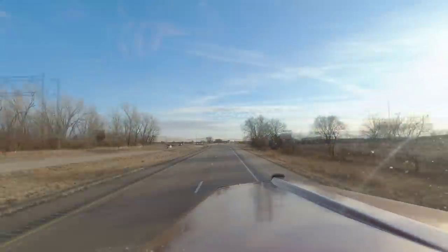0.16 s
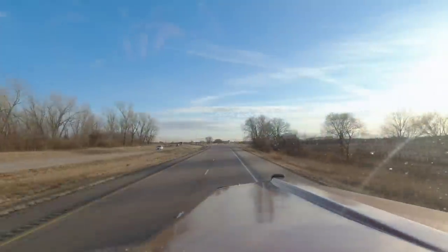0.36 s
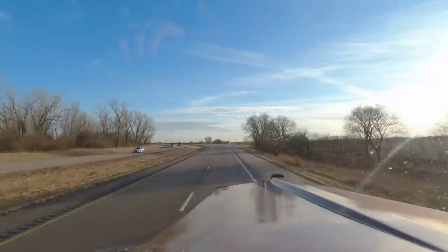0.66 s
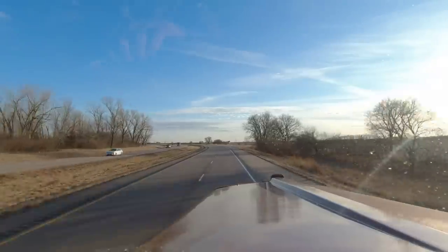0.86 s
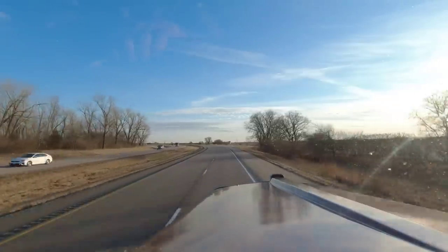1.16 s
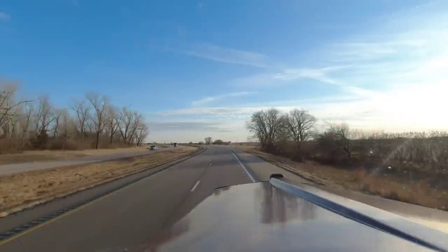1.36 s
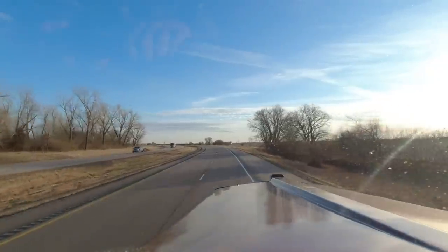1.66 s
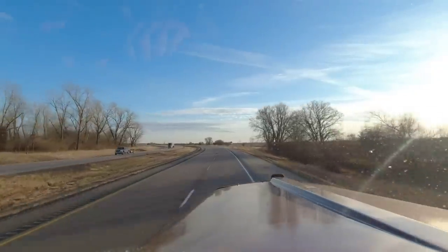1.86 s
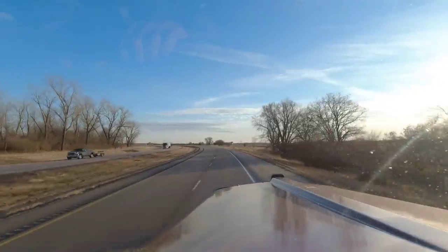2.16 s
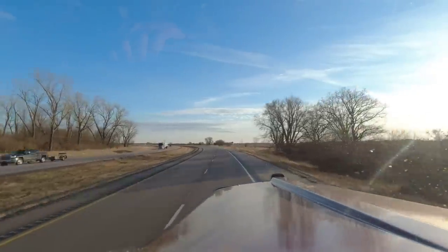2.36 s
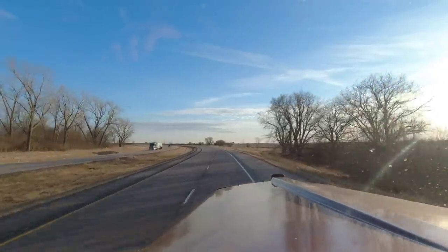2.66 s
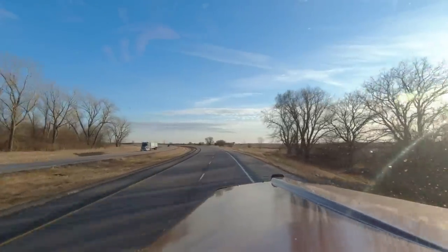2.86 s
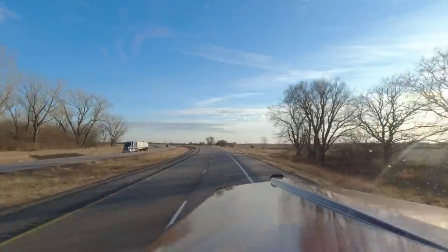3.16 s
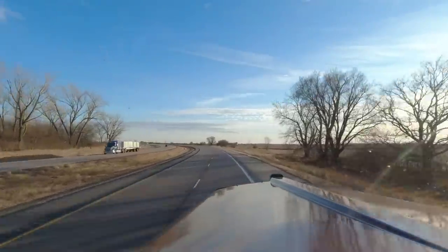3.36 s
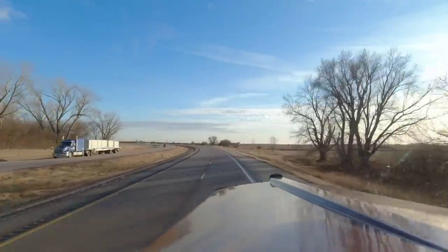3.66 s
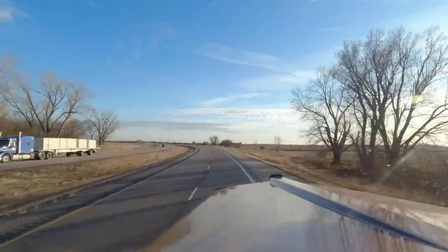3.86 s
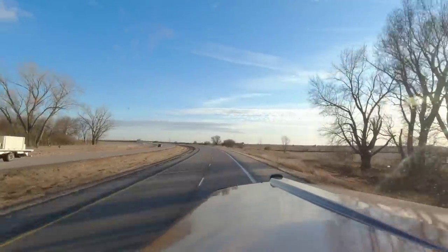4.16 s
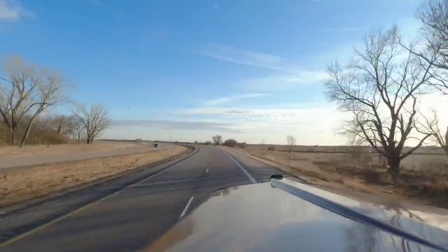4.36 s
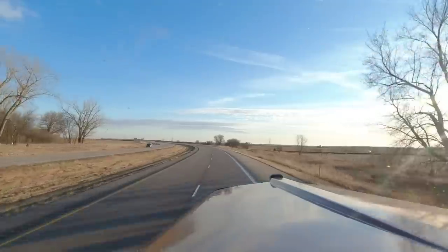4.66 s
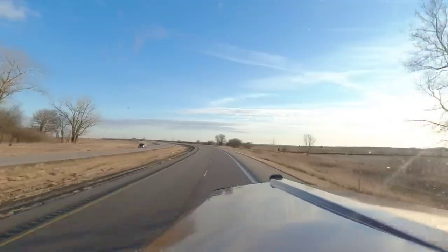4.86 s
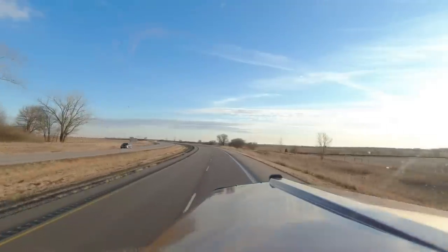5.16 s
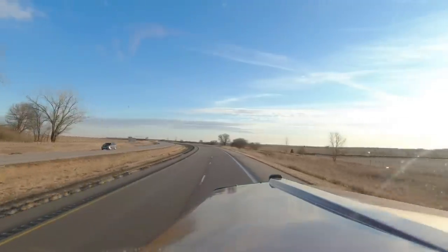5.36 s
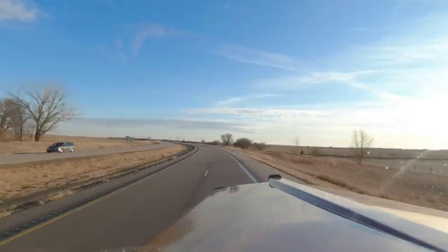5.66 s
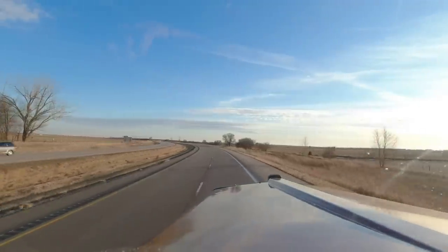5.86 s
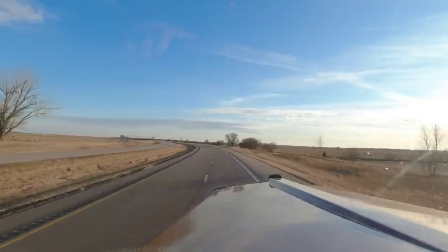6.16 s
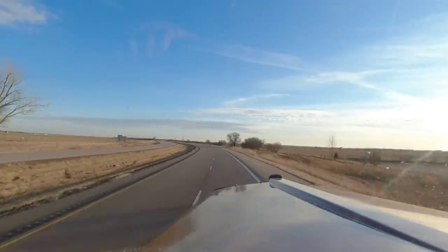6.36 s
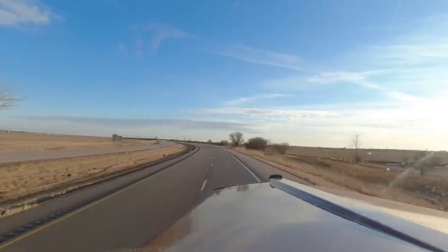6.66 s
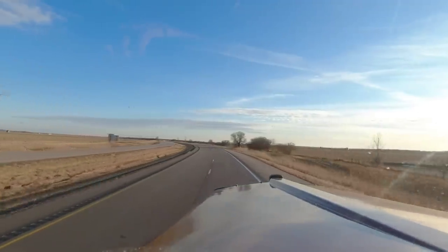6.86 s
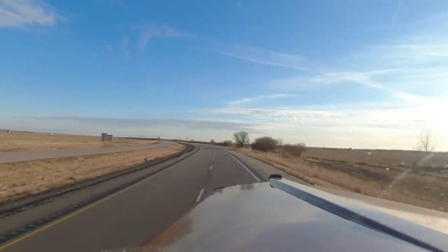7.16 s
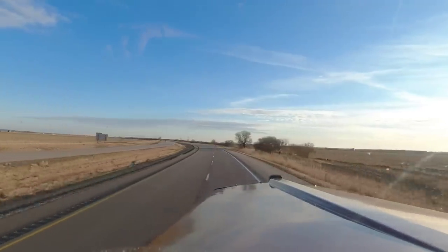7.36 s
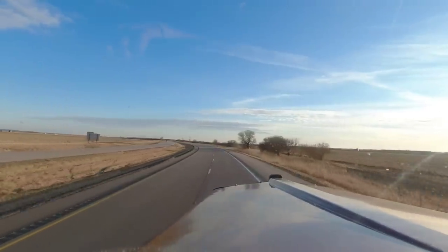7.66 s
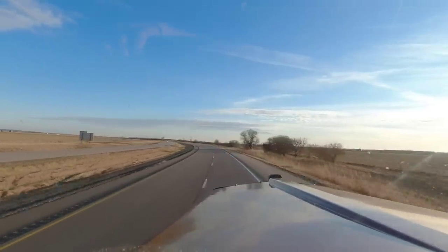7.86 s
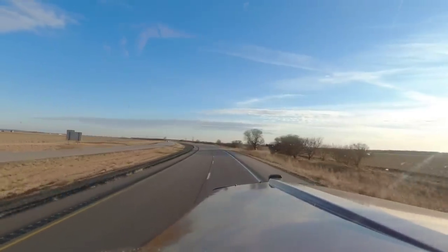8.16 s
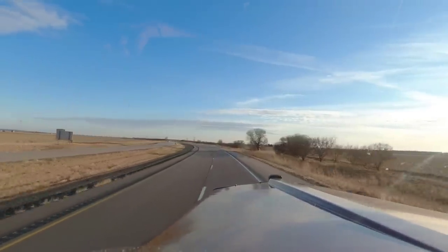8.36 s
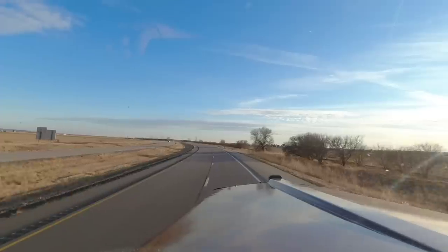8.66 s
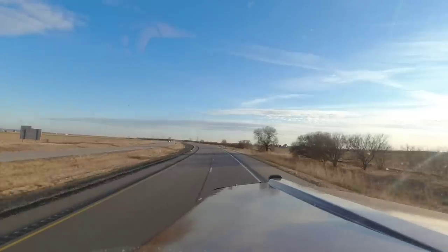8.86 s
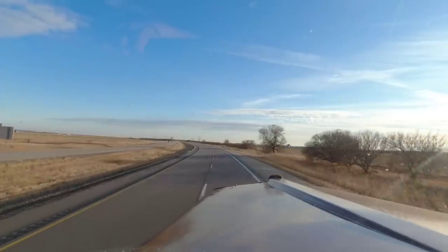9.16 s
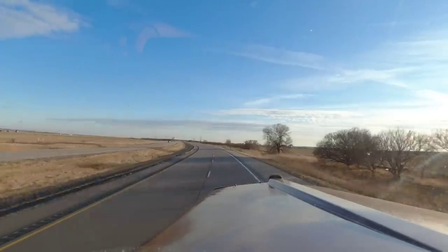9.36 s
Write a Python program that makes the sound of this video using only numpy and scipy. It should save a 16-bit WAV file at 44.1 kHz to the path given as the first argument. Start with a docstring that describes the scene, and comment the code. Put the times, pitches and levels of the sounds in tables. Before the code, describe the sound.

Inside a truck cab, a brief pulsing drone fades, then steady low diesel boom, tyre rumble and wind build, with faint high turbo whistles flaring.

```python
"""A throbbing hollow drone and a falling turbo whistle die away, then a heavy truck cab at cruise swells in.
Crank orders summed as sines make the six-cylinder diesel's drone; cyclic noise makes its growl and clatter.
Shaken narrow-band noise makes a raspy ring, a sine the faint gear whine; the turbo whistle is a blurred
tone plus bands of air noise, flaring at set times. Coloured noise makes the road rumble and wind hiss."""
import sys
import numpy as np
from scipy import signal
from scipy.fft import rfft, irfft, next_fast_len
from scipy.io import wavfile
from scipy.ndimage import uniform_filter1d, map_coordinates

SR = 44100
rng = np.random.default_rng(int(sys.argv[2]) if len(sys.argv) > 2 else 0)


def store_pcm(level_fs):
    """Save levels as 16-bit WAV."""
    pcm = np.round(np.clip(level_fs, -1, 1) * 32767).astype(np.int16)
    wavfile.write(sys.argv[1], SR, np.atleast_2d(pcm).T)


N = 419391


def amp(db):
    """Decibels to gain."""
    return 10 ** (np.asarray(db) / 20)


def unit(x):
    """Scale to rms 1."""
    return x / np.sqrt(np.mean(x ** 2) + 1e-20)


def along(points, hz):
    """Interpolate (hz, value) points on a log frequency axis."""
    f, v = np.transpose(points)
    return np.interp(np.log(hz + 1), np.log(f + 1), v)


def shape(spectrum):
    """Gain over frequency of (hz, db) points."""
    return lambda hz: amp(along(spectrum, hz))


def curves(rows):
    """One value per sample for each column after the time."""
    s, *cols = np.transpose(rows)
    return [np.interp(np.arange(N) / SR, s, c) for c in cols]


def wobble(rate_hz, step=1):
    """Smooth random curve: rate_hz knots a second, one value every step samples."""
    knots = rng.standard_normal(int(N * rate_hz / SR) + 4)
    coarse = np.arange(0, N, 128)
    smooth = map_coordinates(knots, [coarse * rate_hz / SR])
    return np.interp(np.arange(0, N, step), coarse, smooth)


def swell(cruise_db, start_db, rise_s):
    """Level in dB of an amplitude that starts at start_db against cruise_db and closes in on cruise_db."""
    swell_start_s = 0.29
    t = np.maximum(np.arange(N) / SR - swell_start_s, 0)
    return cruise_db + 20 * np.log10(1 + (amp(start_db) - 1) * np.exp(-t / rise_s))


def release(hold_s, db_per_s):
    """Level in dB that holds, then falls at a steady rate."""
    return -db_per_s * np.maximum(np.arange(N) / SR - hold_s, 0)


def filtered(x, response):
    """x times a response over frequency."""
    m = next_fast_len(N + 8192, True)
    gain = response(np.fft.rfftfreq(m, 1 / SR)).astype(np.complex64)
    return irfft(rfft(x.astype(np.float32), m) * gain, m)[..., :N]


def patchy_noise(patchy_db):
    """Two white noises sharing time-frequency patches of random gain."""
    z = signal.stft(rng.standard_normal((2, N)), nperseg=512)[2]
    field = rng.standard_normal(z.shape[1:])
    field = uniform_filter1d(uniform_filter1d(field, 6, 0), 16, 1)
    return unit(signal.istft(z * amp(patchy_db * unit(field)), nperseg=512)[1][:, :N])


def skirt(hz, width_hz):
    """Narrow band of air noise around a pitch: low-passed noise times a carrier."""
    phase = 2 * np.pi * np.cumsum(hz) / SR
    base = signal.lfilter(*signal.butter(1, width_hz, fs=SR), rng.standard_normal((2, N)))
    base = signal.lfilter(*signal.butter(1, 2 * width_hz, fs=SR), base)
    return unit(base * np.cos(phase))


def cab_colour(hz):
    """Gain over frequency of the window reflections: peaks and notches."""
    # centre_hz, width_hz, gain_db
    echoes = [(1047, 40, 2.9), (1300, 60, -1), (1370, 73, 1.5), (1710, 55, -0.5), (2166, 60, 3.5),
              (2260, 70, -5), (2440, 70, 3.5), (2560, 90, -4.5), (2900, 70, -1), (2950, 63, 3),
              (2996, 90, -7), (3260, 310, 1), (3750, 110, -1.5), (5240, 250, -1.3)]
    grid = np.arange(0, SR / 2, 10)
    db = sum(gain_db * np.exp(-(2 * (grid - centre) / width) ** 2) for centre, width, gain_db in echoes)
    return np.interp(hz, grid, amp(db))


def in_cab(pair, colour):
    """Colour a direct and a diffuse signal and spread them over two close microphone ports; mid rms 1."""
    # stereo spread: pitch_hz, side_against_mid_db
    spread = [(60, -23), (92, -18), (140, -32.5), (210, -16), (330, -11.5), (500, -11.5), (760, -14),
              (1170, -7.5), (1780, -2.5), (2720, 2), (4160, 3), (6350, -9), (9710, 0), (14800, -5)]
    # share of the side that reaches the left port early: pitch_hz, share
    early_share = [(300, .1), (1000, 0.46), (2000, .55), (3500, .3), (5000, 0), (8000, 0), (9000, .3),
                   (10500, 0)]
    m = next_fast_len(N + 8192, True)
    hz = np.fft.rfftfreq(m, 1 / SR)
    direct, diffuse = rfft(pair.astype(np.float32), m) * colour(hz) * cab_colour(hz)
    lead = np.clip(along(early_share, hz), -1, 1)
    side = amp(along(spread, hz)) * (1j * lead * direct + np.sqrt(1 - lead ** 2) * diffuse)
    mid, side = irfft(np.array([direct, side], np.complex64), m)[:, :N]
    return np.array([mid + side, mid - side]) / np.std(mid)


def drone(turns, waver_db, sway_rad, lag_s):
    """Crank orders boom in the cab: the firing orders, and others from unequal cylinders."""
    # crank orders, 3 being the firing rate: multiple_of_crank_speed, level_db
    orders = [(1.0, -27), (1.5, -39), (2.0, -22), (2.5, -39), (3.0, -18.5), (3.5, -46), (4.0, -30.5),
              (4.5, -28), (5.0, -26), (6.0, -17), (6.5, -50), (7.0, -24), (7.5, -31.5), (8.0, -27.5),
              (8.5, -34.5), (9.0, -18.7), (9.5, -39), (10.0, -30), (10.5, -39), (11.0, -35), (11.5, -45),
              (12.0, -38.5), (12.5, -44), (13.0, -35.3), (13.5, -39.5), (14.0, -32.5), (14.5, -44),
              (15.5, -47.5), (16.0, -44.5), (16.5, -38), (17.0, -42), (17.5, -41), (19.5, -52), (21.0, -45),
              (22, -50.5), (23.0, -46.5), (24, -56), (26, -57), (27, -48.5), (28, -52), (28.5, -47.5),
              (29, -58)]
    # the cab delays high orders more, smearing each pulse into an even beat; cycles per order squared
    firing_smear, imbalance_smear = .088, .554
    step = 16
    coarse_turns, out = turns[::step], 0
    for multiple, db in orders:
        order = round(2 * multiple) / 2
        smear = firing_smear if order % 3 == 0 else imbalance_smear
        phase = 2 * np.pi * (order * coarse_turns + smear * order ** 2) + sway_rad * wobble(2.42, step)
        out = out + amp(db + waver_db * wobble(2.49, step)) * np.cos(phase)
    boom = unit(signal.resample_poly(out, step, 1, window=("kaiser", 9))[:N])
    n = np.arange(N)
    return np.array([boom, np.interp(n - lag_s * SR, n, boom)])  # the right port hears it later


def cycle(turns):
    """Two signals repeating every two crank turns, with all engine orders equally strong."""
    size = 4096
    orders = np.exp(2j * np.pi * rng.random((2, size // 2 + 1)))
    return unit(irfft(orders))[:, (turns / 2 % 1 * size).astype(int)]


def combustion(turns, repeat, pulsing, lope, drift_rad):
    """Burn and valve noise: a slowly changing cyclic pattern, surging with each firing and each turn."""
    blend = drift_rad * wobble(1.498)
    repeated = np.cos(blend) * cycle(turns) + np.sin(blend) * cycle(turns)
    share = np.clip(repeat, 0, 1)
    burn = np.sqrt(share) * repeated + np.sqrt(1 - share) * rng.standard_normal((2, N))
    firing = np.cos(2 * np.pi * 3 * turns)
    return burn * (1 + pulsing * firing + lope * np.cos(2 * np.pi * turns))


def panels(hz):
    """Gain over frequency of the cab panels that resonate with the engine."""
    # centre_hz, width_hz, level_db
    resonances = [(500, 36, -4), (654.3, 39, -4.5), (774, 53, -7.5), (946, 40, -11.5)]
    return sum(amp(db) / (1 + ((hz - centre) / (width / 2)) ** 2) ** 0.79
               for centre, width, db in resonances)


def growl(turns):
    """Combustion noise rings the cab panels."""
    # slow drift: time_s, drift_db
    drift = [(.75, -3), (1.05, 0), (1.3, -3), (1.9, 2.5), (2.3, -2), (3.65, 1), (5.1, -1), (6.1, -0.5),
             (6.45, -1), (6.68, 3), (7.1, -3.5), (7.8, 1), (8.8, -3)]
    level_db = swell(cruise_db=-33, start_db=-7.5, rise_s=0.17) + curves(drift)[0]
    burn = combustion(turns, repeat=0.6, pulsing=0.049, lope=0.12, drift_rad=0.92)
    return amp(level_db + 0.67 * wobble(5.4)) * in_cab(burn, panels)


def clatter(turns, swell_db, drift_db):
    """Combustion noise in a brighter band, in random clumps."""
    # pitch_hz, level_db_per_hz
    spectrum = [(300, -25), (450, 2), (600, -4.5), (1050, 0.5), (1280, -1), (1530, -0.5), (1720, -10),
                (1930, -7.5), (2010, -5.5), (2200, -7.5), (2600, -15.5), (5000, -29.5), (9000, -80)]
    clumps_db = 0.8 * wobble(8) + 1.0 * wobble(32)
    burn = combustion(turns, repeat=0.32, pulsing=0.03, lope=0.036, drift_rad=1.23)
    return amp(swell_db + 0.85 * drift_db + clumps_db) * in_cab(burn, shape(spectrum))


def rasp(turns, swell_db, drift_db):
    """An unsteady engine-block resonance, shaken by each firing, stands out as the clatter swells."""
    centre_hz, width_hz, wander_hz = 1499, 82, 25
    against_clatter_db, follows = -11, 1.8  # drifts more steeply than the clatter
    ring = skirt(centre_hz + wander_hz * wobble(3), width_hz)
    firing = 1 + .35 * np.cos(2 * np.pi * 3 * turns)
    level_db = swell_db + against_clatter_db + follows * drift_db + 1.4 * wobble(18)
    return amp(level_db) * in_cab(ring * firing, np.ones_like)


def gear_whine(turns, clatter_swell_db):
    """A thin tone tied to the crank speed."""
    mean_hz, against_clatter_db = 2000, -24
    mesh = turns / turns[-1] * mean_hz * N / SR
    tone = unit(np.sin(2 * np.pi * mesh + wobble(12)))
    return amp(against_clatter_db + clatter_swell_db + 2.2 * wobble(5.4)) * tone


def panel_hum():
    """The lowest cab panel hums by itself: a narrow, fuzzy note that comes and goes."""
    # time_s, level_db
    hum_level = [(0, -47), (.35, -40), (1, -40), (1.9, -33.5), (2.5, -46), (3.5, -36), (4.4, -48),
                 (6.6, -38.5), (7.3, -48), (9, -53)]
    level_db, = curves(hum_level)
    return amp(level_db) * skirt(np.full(N, 495.4), width_hz=9.6)[0]


def whistle(hz, width_hz, flutter_db):
    """A blade tone blurred by turbulence, differently at each port; rms 1."""
    phase = 2 * np.pi * np.cumsum(hz + width_hz * wobble(70)) / SR
    shared = amp(flutter_db * wobble(22)) * np.sin(phase)
    scatter = wobble(45) * np.sin(phase) + wobble(45) * np.cos(phase)
    return unit(unit(shared) + 0.22 * np.array([scatter, -scatter]))


def flares():
    """Extra dB of the whistle and of its octave: one bell-shaped surge for each flare."""
    # high-boost flares: peak_s, length_s, whistle_gain_db, octave_gain_db
    surges = [(4.38, .2, 5, 0), (4.8, 0.2, 4, 0), (5.002, 0.16, 7, 3), (5.258, .2, 6.5, 2),
              (5.414, 0.073, 3, 0), (5.706, .2, 6.5, 8), (6.04, 0.11, 3, 3), (6.29, 0.099, 3, 1),
              (6.486, 0.15, 7, 10), (6.68, .2, 10, 2), (7.21, 0.24, 11, -3), (7.45, 0.19, 6.5, -2),
              (7.618, 0.11, 8, 3), (7.845, 0.14, 4.5, 0), (8.05, .13, 8, -2), (8.208, 0.17, 6.5, -4),
              (8.37, 0.085, 7.5, 0), (8.56, 0.11, 3, 0), (8.75, .12, 1, 0), (9.07, .2, 0.5, 5)]
    t = np.arange(N) / SR
    return sum(np.outer(gains_db, np.exp(-(2 * (t - s) / length_s) ** 2))
               for s, length_s, *gains_db in surges)


def turbo():
    """The whistle grows with turbo speed: breathy at low boost, a clear tone when it flares."""
    # whistle under load: time_s, pitch_hz
    pitch = [(1, 6225), (3, 6240), (4, 6290), (5, 6375), (6, 6450), (7.3, 6530), (8.2, 6530), (9.3, 6440)]
    hz, = curves(pitch)
    above_low_boost_hz = hz - 6260
    flare_db, octave_flare_db = flares()
    whistle_swell_db = swell(cruise_db=-55.5, start_db=-23, rise_s=0.63)
    level_db = whistle_swell_db + 0.0139 * above_low_boost_hz + flare_db  # slopes in dB per Hz
    octave_db = swell(cruise_db=-61.5, start_db=-24.5, rise_s=1.5) + 0.0142 * above_low_boost_hz
    clear_db, clear_span_db = -54.5, 5.5  # breath turns to tone around this level, over this span
    clear = 1 / (1 + np.exp(-(level_db - clear_db) / clear_span_db))
    tone = clear * whistle(hz, width_hz=10.04, flutter_db=2.5) * amp(1.5)
    air = np.sqrt(1 - clear) * skirt(hz, width_hz=37) * amp(3.0)
    octave_tone = clear * whistle(2 * hz, width_hz=26, flutter_db=1)
    octave_air = amp(1) * np.sqrt(clear) * skirt(2 * hz, width_hz=110)
    octave = amp(octave_flare_db) * (octave_tone + octave_air)
    octave = octave + skirt(2 * hz - 160, width_hz=330) * amp(2.0)
    intake = amp(whistle_swell_db - 2.5) * skirt(hz - 200, width_hz=150)  # rushing air just below the tone
    return amp(level_db) * (tone + air) + intake + amp(octave_db) * octave


def spin_down():
    """A turbo whistle falls in pitch, thins and fades away."""
    # time_s, pitch_hz
    pitch = [(0, 7520), (.11, 7180), (.2, 6780), (.31, 6260), (.46, 5740)]
    t = np.arange(N) / SR
    hz, = curves(pitch)
    surge_db, surge_decay_s, fade_db_per_s = 18.5, 0.063, 5
    tone_db = -56.5 + surge_db * np.exp(-t / surge_decay_s) - fade_db_per_s * t
    tone = amp(tone_db) * whistle(hz, width_hz=18, flutter_db=3.0)
    breath = amp(-56) * skirt(hz - 50, width_hz=120)
    octave_db = -54 + release(hold_s=.17, db_per_s=55)  # gives out first
    octave = amp(octave_db) * skirt(2 * hz - 200, width_hz=300)
    return amp(release(hold_s=.42, db_per_s=300)) * (tone + breath + octave)


def opening(firing_hz):
    """A hollow drone, mostly second and third firing harmonics, throbs once a crank turn and dies away."""
    # rough part: pitch_hz, level_db_per_hz
    boom = [(10, -4), (50, 4), (105, -16), (145, 4), (175, 3), (210, -6), (240, -25), (330, -40),
            (900, -120)]
    level_db, fade_db_per_s, release_db_per_s = -15.5, 42, 350
    throb_depth, throb_start_s = 0.36, 0.0066
    t = np.arange(N) / SR
    drone_db = level_db - fade_db_per_s * t + release(0.228, release_db_per_s)
    phase = 2 * np.pi * firing_hz * t + 0.18 * wobble(25)
    second = amp(-2 + release(0.12, release_db_per_s))  # gives out first
    hollow = amp(-14) * np.sin(phase) + second * np.sin(2 * phase) + np.sin(3 * phase)
    # unequal cylinders add the crank order just below the third harmonic
    hollow = hollow + amp(-9.5) * np.sin(8 / 3 * phase + 2 * np.pi * rng.random())
    throb = 1 + throb_depth * np.cos(2 * np.pi * firing_hz / 3 * (t - throb_start_s))
    rough = amp(-8.5) * unit(filtered(rng.standard_normal(N), shape(boom)))
    return amp(drone_db) * (throb * unit(hollow) + rough)


def rumble(drone_swell_db):
    """Tyres and chassis: low noise that swells with the drone."""
    # pitch_hz, level_db_per_hz
    spectrum = [(3, -6), (11, -2), (24, 0), (41, 7), (62, -3.5), (80, -5.5), (101, 3), (118, -2.5),
                (140, -9), (195, -1.5), (230, -9), (330, -21), (600, -48), (2000, -120)]
    return amp(drone_swell_db - 6.5) * in_cab(rng.standard_normal((2, N)), shape(spectrum))


def road(clatter_drift_db):
    """Patchy tyre noise, swelling once with each turn of the wheels."""
    # pitch_hz, level_db_per_hz
    spectrum = [(60, -26.5), (200, -11.5), (290, -9.5), (410, -13), (450, -19), (580, -24.5), (1000, -28.5),
                (1700, -38.5), (4000, -61.5), (9000, -120)]
    wheel_hz, wheel_db = 7.5, 1.05
    follows = 0.15  # share of the clatter's drift taken up
    level_db = swell(cruise_db=-25, start_db=-7, rise_s=0.32) + follows * clatter_drift_db
    turn_db = wheel_db * np.sin(2 * np.pi * wheel_hz * np.arange(N) / SR + wobble(1))
    noise = in_cab(patchy_noise(patchy_db=1.0), shape(spectrum))
    return amp(level_db + turn_db + 0.4 * wobble(6.0)) * noise


def wind():
    """Air rushing around the cab: patchy noise with gusty level."""
    # pitch_hz, level_db_per_hz
    spectrum = [(500, -11), (1500, 10), (2600, 10.5), (3400, 11), (4400, 4.5), (5800, 3.5), (7100, -3.5),
                (9200, -9), (15000, -40)]
    level_db = swell(cruise_db=-45.5, start_db=-7, rise_s=0.25) + 0.5 * wobble(9) + 0.8 * wobble(35)
    return amp(level_db) * in_cab(patchy_noise(patchy_db=1.1), shape(spectrum))


def hiss():
    """The bright top of the air noise: patchy noise of fluttering level."""
    # pitch_hz, level_db_per_hz
    spectrum = [(4000, -40), (7100, -4.5), (9200, 2), (11600, -1), (13500, -1.5), (15000, -7)]
    level_db = swell(cruise_db=-52.5, start_db=-7.5, rise_s=0.81) + 0.5 * wobble(35)
    return amp(level_db) * in_cab(patchy_noise(patchy_db=.8), shape(spectrum))


def scene():
    """Engine, turbo, road and wind as heard behind the windscreen."""
    # crankshaft: time_s, speed_rpm
    speed = [(1, 1423.1), (2, 1422.0), (3, 1419.8), (5, 1416.4), (7, 1419.4), (9, 1420.8)]
    # slow drift of the clatter, scaled in each layer that follows it: time_s, drift_db
    clatter_drift = [(.28, 2), (.5, 4.5), (.7, 2.5), (1.05, 3.5), (1.55, 0), (2.03, 3.5), (2.45, -0.5),
                     (2.7, 2), (3.7, 1), (4.25, 0.5), (4.6, -1.5), (5.35, -3), (5.75, -1), (6.35, -2.5),
                     (7.1, -2), (7.6, 0.5), (8.05, -1), (8.6, -3), (9.5, -2)]
    rpm, = curves(speed)
    turns = np.cumsum(rpm + .6 * wobble(4)) / SR / 60
    drift_db, = curves(clatter_drift)
    drone_swell_db = swell(cruise_db=-12, start_db=-16, rise_s=1.35)
    clatter_swell_db = swell(cruise_db=-35, start_db=-12, rise_s=0.99)
    engine = amp(drone_swell_db + 0.25) * drone(turns, waver_db=0.37, sway_rad=0.068, lag_s=0.0001)
    engine = engine + growl(turns) + clatter(turns, clatter_swell_db, drift_db)
    engine = engine + rasp(turns, clatter_swell_db, drift_db) + gear_whine(turns, clatter_swell_db)
    start = spin_down() + opening(firing_hz=72.2)
    background = rumble(drone_swell_db) + road(drift_db) + wind() + hiss()
    return engine + panel_hum() + turbo() + start + background


def record(dry):
    """Round off the highest peaks and keep nothing above the band limit."""
    top_hz = 15200
    held = dry / (1 + np.abs(dry) ** 12) ** (1 / 12)
    return filtered(held, lambda hz: hz < top_hz)


dry = scene()
out = record(dry)
store_pcm(out)
```